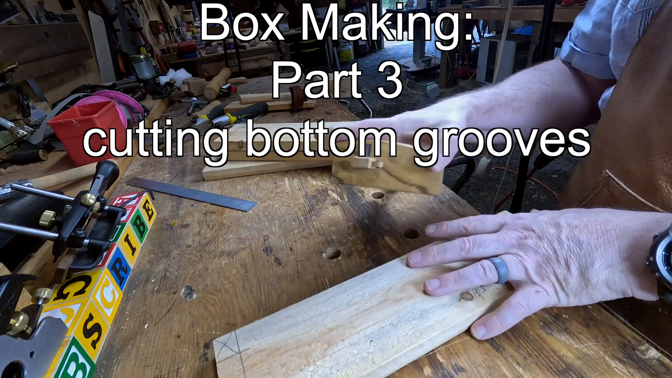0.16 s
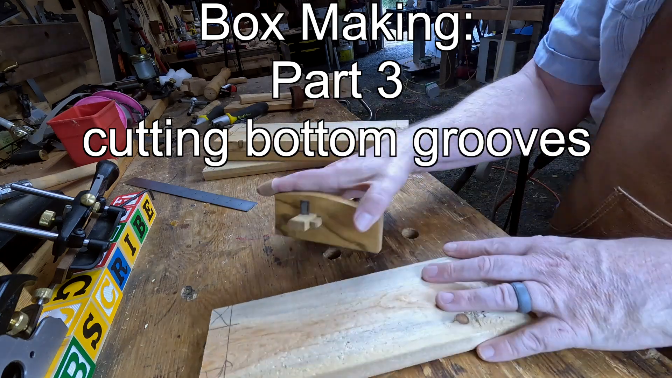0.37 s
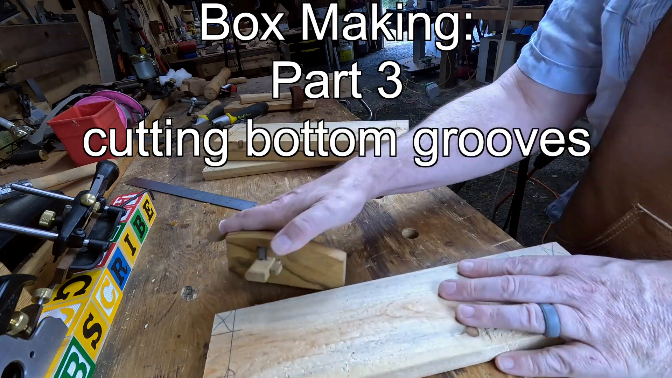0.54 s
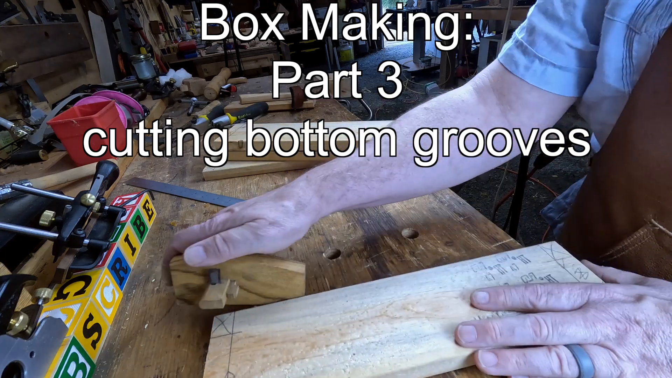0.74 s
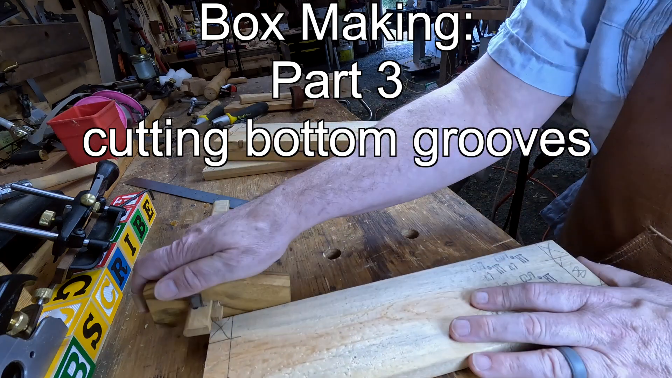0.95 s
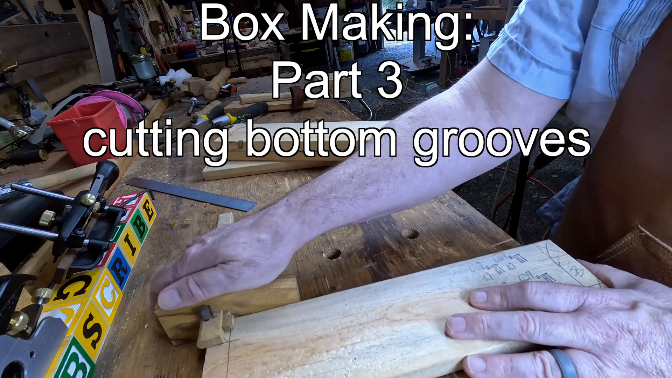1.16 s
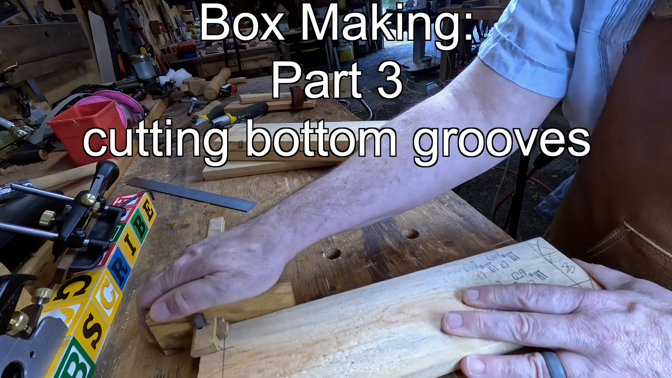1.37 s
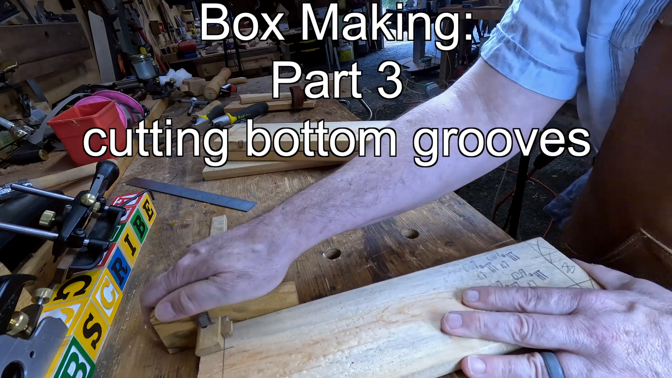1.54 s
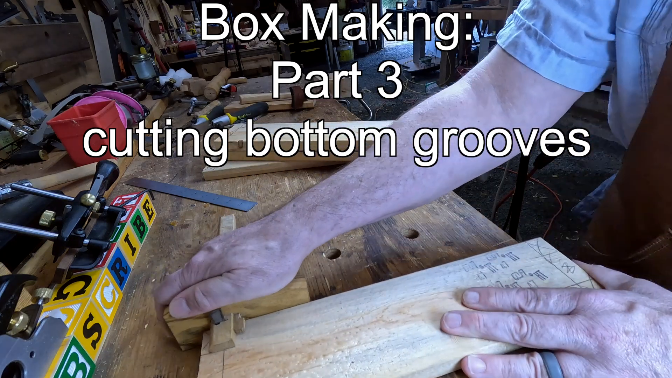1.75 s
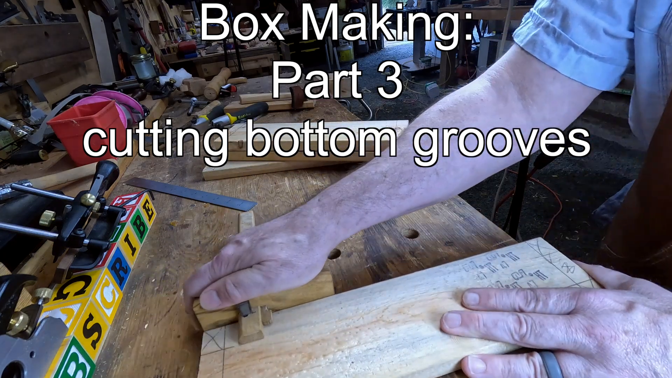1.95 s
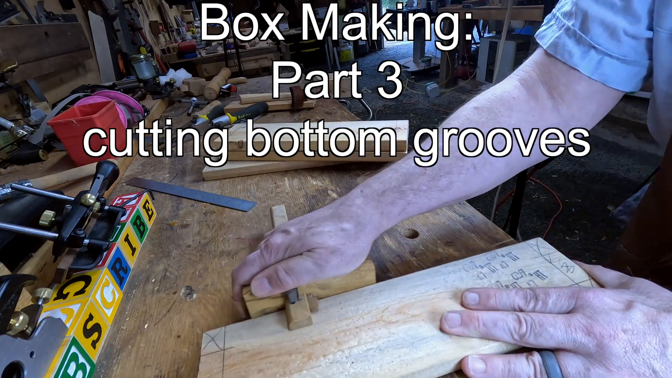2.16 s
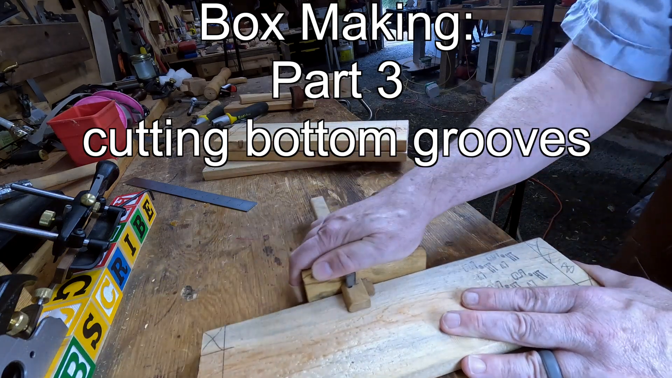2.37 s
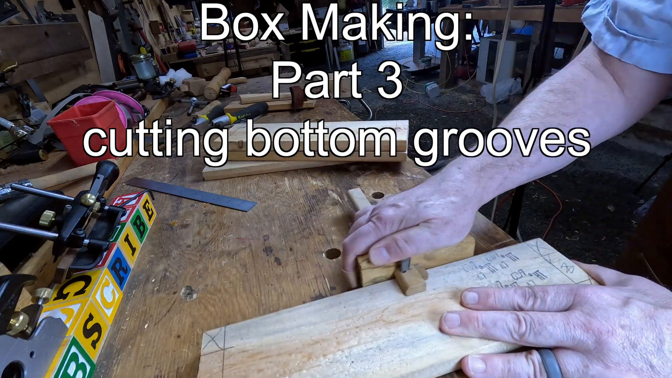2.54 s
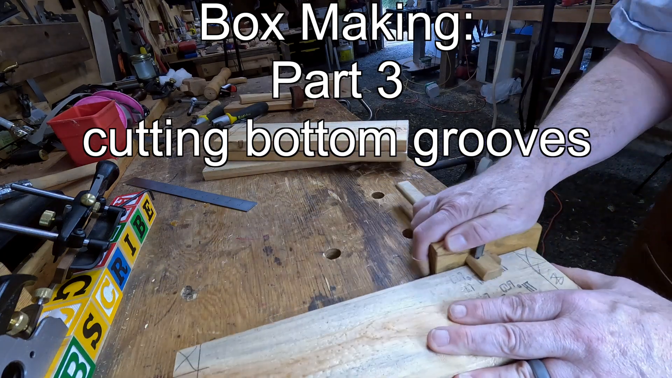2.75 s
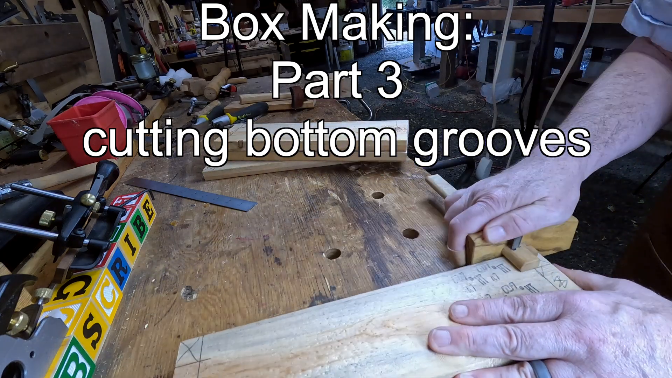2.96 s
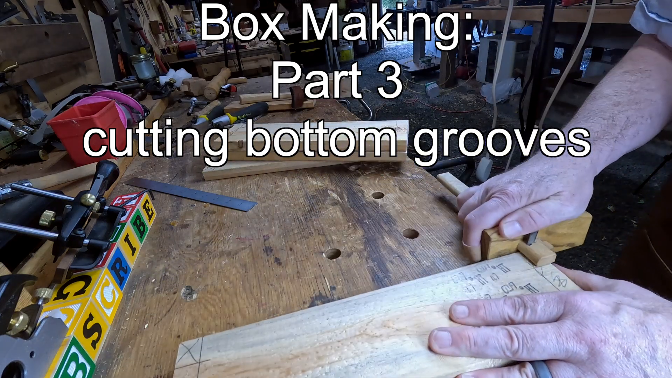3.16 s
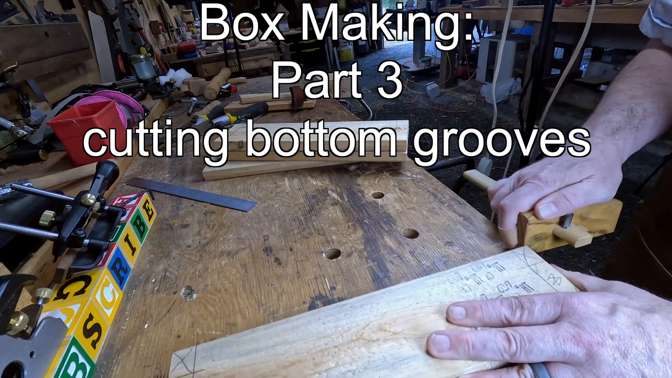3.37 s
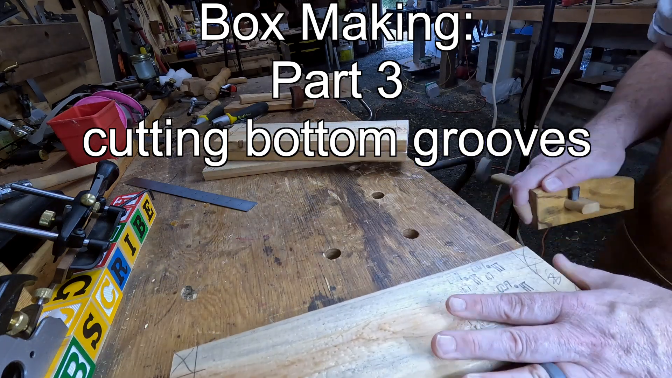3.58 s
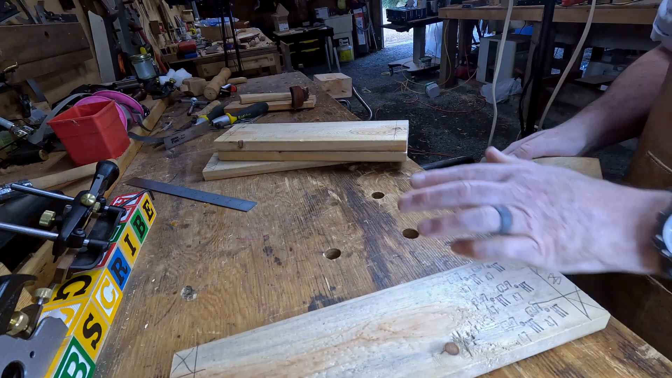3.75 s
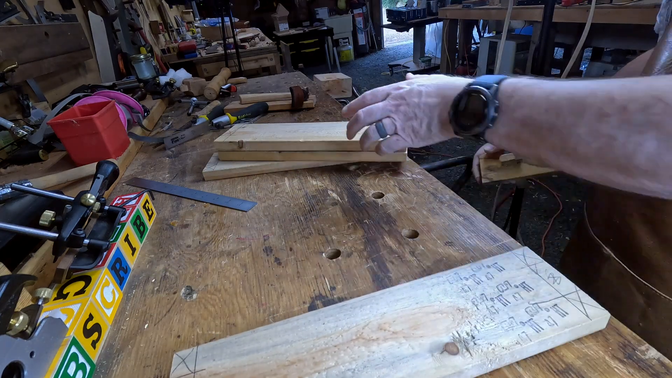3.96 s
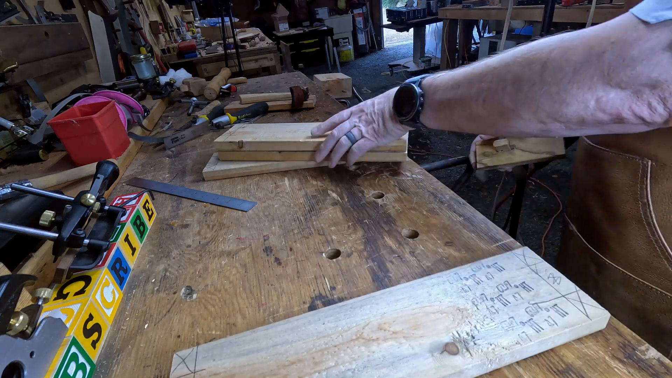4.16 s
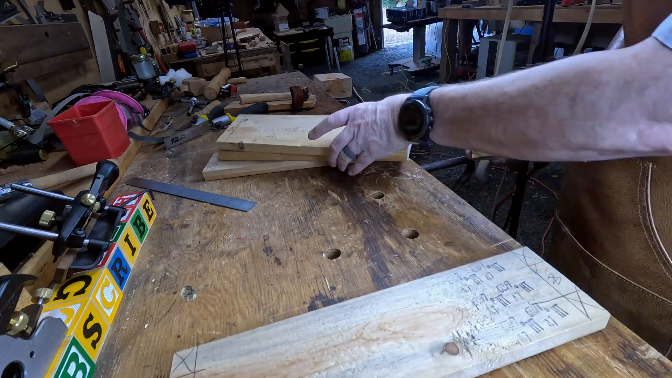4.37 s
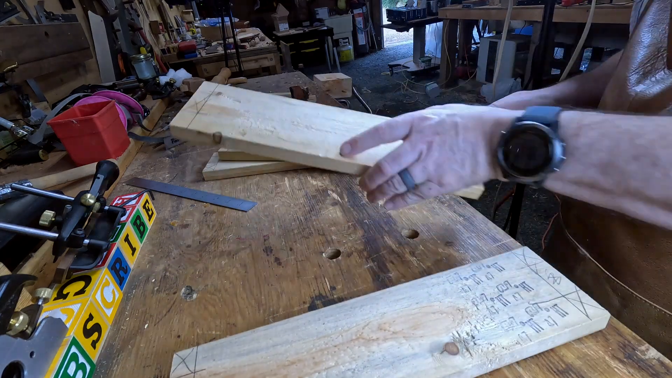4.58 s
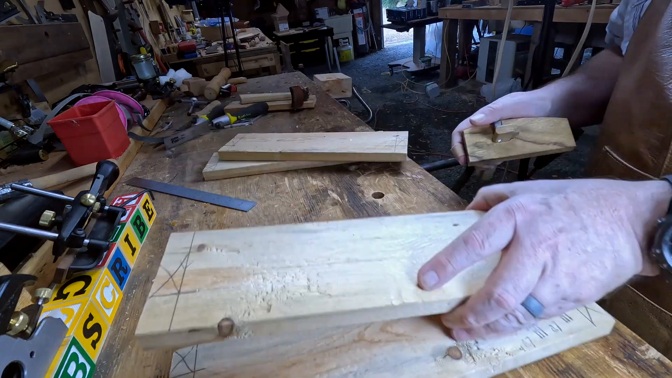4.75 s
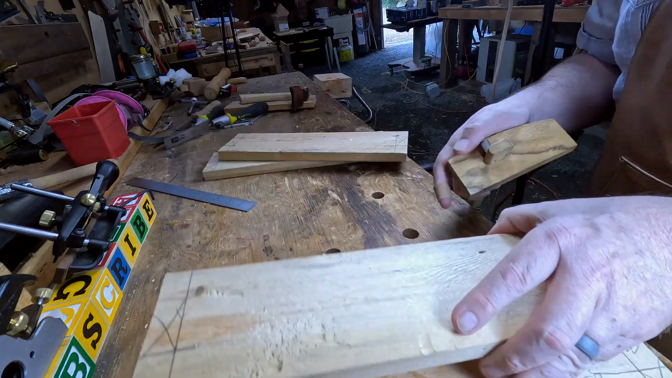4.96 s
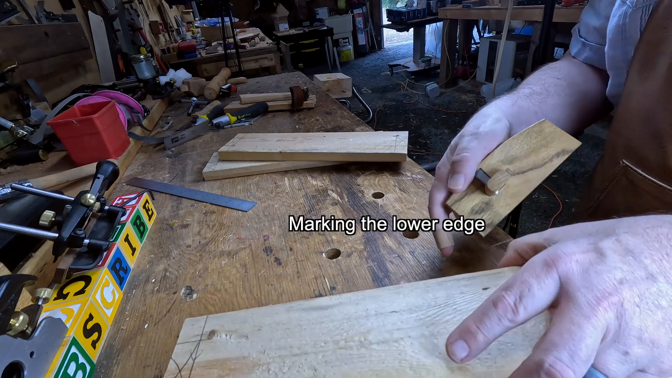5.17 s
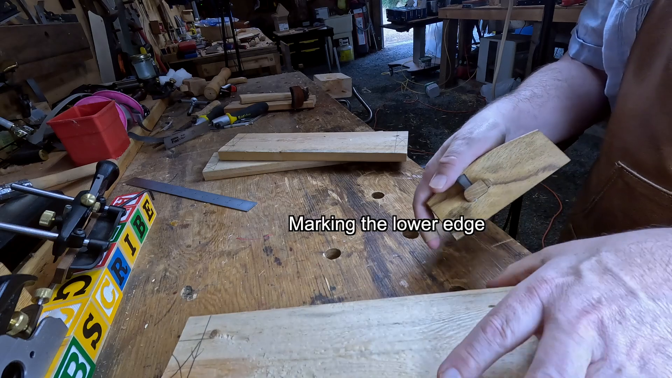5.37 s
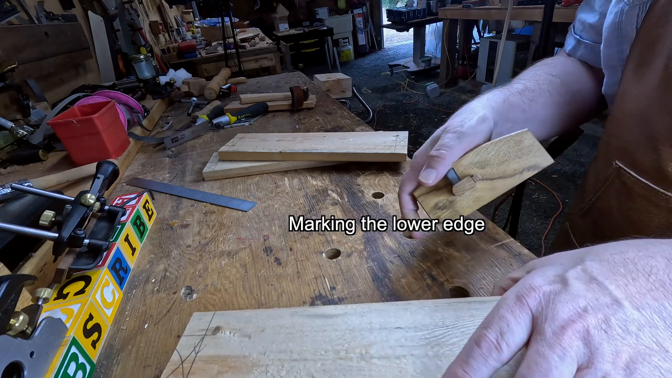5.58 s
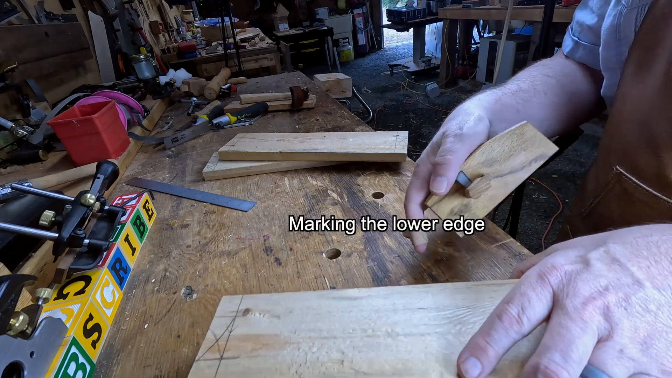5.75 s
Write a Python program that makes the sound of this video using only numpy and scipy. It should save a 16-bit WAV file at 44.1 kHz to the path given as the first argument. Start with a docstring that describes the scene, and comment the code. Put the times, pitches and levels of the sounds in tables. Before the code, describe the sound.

A close, dry stereo view of woodworking in a quiet shop with a faint steady murmur and very short room tail. From 0 to 0.8 s, palms and wood rub softly with low, cushioned bench bumps and a small click near 0.56. At about 1.0 s the tool meets the work with a double knock, a dull thud with a crisp click, then small taps and rubbing near 1.3-1.4. From 1.5 s a dry scrape along the grain swells, with a woody knock at 2.5 and its harshest, stuttering rasp near 2.7, then falls away by 3.0. Light rubs and ticks continue to 3.6; a quieter stretch has faint handling until a brief scuff and bump around 4.2-4.3. At 4.78-4.9 a board lands with a sharp crack and rattling knocks; at 5.14-5.28 another clatter rings brighter and hollow. Soft scuffs and rubs finish to about 5.8.

```python
"""In a quiet cluttered workshop, boards and a small wooden tool are handled on a heavy workbench.
Contacts thud through decaying bench modes, rap the boards through short bursts, and click as shaped noise.
Wood and skin rub along the grain: spiky noise hisses in the air and drives the tool, boards, bench and frame.
Clicks and hiss also bounce off the bench top; a short room tail and a steady murmur lie behind."""
import sys
import numpy as np
from scipy import signal
from scipy.fft import rfft, irfft, next_fast_len
from scipy.io import wavfile
from scipy.ndimage import uniform_filter1d, map_coordinates

SR = 44100
rng = np.random.default_rng(int(sys.argv[2]) if len(sys.argv) > 2 else 0)


def master_out(mix):
    """Clip the mix to full scale and print it as 16-bit PCM to the path in sys.argv[1]."""
    frames = np.transpose(np.atleast_2d(mix))
    ceiling = np.clip(frames, -1, 1)
    pcm = np.round(ceiling * 32767).astype(np.int16)
    wavfile.write(sys.argv[1], SR, pcm)


N = 256662  # samples


# hard contacts; levels are relative drives: (time [s], rap level [dB], thud level [dB], boom level [dB],
# click level below 7 kHz [dB], click level above 7 kHz [dB])
KNOCKS = [(0.561, -40, -48, -60, -16, -14.5), (1.02, -17, -23, -37, -23, -29),
          (1.06, -20, -18, -20, -9, -18.5), (1.296, -40.5, -29.5, -36, -60, -30),
          (1.539, -41, -55, -48, -36, -38), (1.952, -31, -28, -42, -14.5, -30),
          (1.966, -55, -28, -34.5, -37.5, -38), (2.501, -9.5, -21.5, -34, -21.5, -38),
          (2.662, -50, -41, -46, -15, -30), (3.026, -75, -69, -42, -27, -46),
          (3.288, -55, -41, -43, -14, -6.5), (3.294, -32.5, -26, -27.5, -14.5, -36),
          (3.592, -25.5, -28, -29.5, -76, -48), (4.093, -50, -64.5, -72, -32, -36),
          (4.27, -76, -55, -35, -28, -19.5), (4.779, -25, -20, -32, -14.5, 0.5),
          (4.828, 1, -17.5, -34, -39, -21), (4.84, -18.5, -26, -29, -21, -22),
          (4.849, -21.5, -22.5, -28, -28.5, -27), (4.859, -20, -24.5, -46, -29, -22),
          (4.901, -23, -29.5, -22.5, -47, -30), (5.049, -28.5, -29, -31, -11, -19),
          (5.142, -4.5, -20.5, -33, -33, -32), (5.154, -15, -47, -39, -39, -23),
          (5.182, -17.5, -36, -32, -14, -37), (5.195, -34, -20.5, -26.5, -12, -40),
          (5.28, -31, -26, -21.5, -39, -37), (5.416, -43, -44.5, -41, -40, -45),
          (5.616, -48, -41, -43, -42, -47), (5.797, -35, -36.5, -36, -38, -40)]
# soft pushes of palm and fingers: (time [s], thud level [dB], boom level [dB])
BUMPS = [(0.25, -59, -39), (0.271, -29.5, -37), (0.299, -46, -30), (0.326, -37, -23), (0.342, -60, -29.5),
         (0.595, -44, -32), (0.783, -52, -37.5), (0.964, -54, -33.5), (4.193, -57, -46.5),
         (4.214, -50, -31), (4.344, -42, -28), (4.459, -55.5, -40.5), (4.786, -18, -37),
         (5.214, -34, -22.5), (5.239, -31, -25), (5.607, -41, -32)]
# modes of the bench top: (frequency [Hz], level [dB], decay by 60 dB [s])
BENCH_TOP = [(167.3, -10, 0.29), (219.2, -6, 0.16), (252.2, 7, 0.089), (287.2, 2, 0.064),
             (365.3, -4.5, 0.088), (406.5, -5.5, 0.12), (497.5, -10.5, 0.099)]
# modes of the boards lying on the bench: (frequency [Hz], level [dB], decay by 60 dB [s])
BOARDS = [(537, -11, 0.057), (589, -8, 0.071), (660.5, -4.5, 0.064), (802, 0, 0.029), (899, -15.5, 0.056),
          (1040, -4, 0.023), (1147, -4.5, 0.021), (1340, -6.5, 0.033), (1512, -9.5, 0.019)]
# modes of the bench frame: (frequency [Hz], level [dB], decay by 60 dB [s])
BENCH_FRAME = [(40, -7, 0.24), (60, -11, 0.2), (96.6, 0.5, 0.25), (113.8, -10.5, 0.23)]
# colour of the clicks: (frequency [Hz], level per Hz [dB])
CLICK_COLOUR = [(530, -71), (900, 4), (2780, -1), (4230, -2.5), (5460, -9.5), (8200, -10), (9320, -29),
                (10300, -17), (14500, -35)]


def knocks():
    """Hard contacts push the bench, rap the boards and crack; soft ones only move the bench."""
    wood, air = np.zeros(N + SR), np.zeros((2, N + SR))
    t = np.arange(SR // 2) / SR
    spread_db = 2  # standard deviation of mode strengths, halved for the hard thuds

    for time, rap_db, thud_db, boom_db, *click_db in KNOCKS:
        start = round(time * SR)
        boards = chatter(ringing(BOARDS, spread_db, rise=0.45), t60=0.008)
        rap = amp(rap_db) * cushioned(boards, rap_db - click_db[0])
        thud = amp(thud_db) * ringing(BENCH_TOP, spread_db / 2, rise=0.76)
        boom = amp(boom_db) * ringing(BENCH_FRAME, spread_db, rise=0.28)
        wood[start:][:len(t)] += boom + thud + rap

        # a fast fall with a faint longer tail, after a soft onset
        fall = amp(-60 * t / 0.014) + 0.057 * amp(-60 * t / 0.076)
        shape = fall * (1 - np.exp(-t / 0.00067))
        air[:, start:][:, :len(t)] += amp(click_db)[:, None] * shape * rng.standard_normal(len(t))

    for time, thud_db, boom_db in BUMPS:
        thud = amp(thud_db) * ringing(BENCH_TOP[:6], spread_db, rise=2.9)
        boom = amp(boom_db) * ringing(BENCH_FRAME, spread_db, rise=0.23)
        wood[round(time * SR):][:len(t)] += thud + boom

    def click_bands(hz):
        high = hz ** 8 / (hz ** 8 + 7000 ** 8)
        return causal(amp(along(CLICK_COLOUR, hz)) * [1 - high, high])

    cracks = filtered(air[:, :N], click_bands).sum(axis=0)
    return wood[:N] + bench_echo(cracks, share=0.15)


CONTACT_S_PER_DB = 1.3e-5  # contact time grows as the click falls under the rap


def cushioned(x, soft_db):
    """A softer contact lasts longer and dulls the rap."""
    t = np.arange(128) / SR
    push = t * np.exp(-t / (CONTACT_S_PER_DB * max(soft_db, 2)))
    return np.convolve(x, push / push.sum())[1:len(x) + 1]


def chatter(body, t60):
    """Wood never lands in one point: a short burst of small contacts drives the body."""
    t = np.arange(SR // 30) / SR
    force = amp(-60 * t / t60) * rng.standard_normal(len(t))
    force[0] += 11  # extra weight on the first contact
    return signal.fftconvolve(body, force / np.linalg.norm(force))[:len(body)]


def causal(gain):
    """The same gains with the phase of a real body: nothing sounds before the blow."""
    cepstrum = irfft(np.log(gain + 1e-6))
    half = gain.shape[-1] - 1
    cepstrum[..., 1:half] *= 2
    cepstrum[..., half + 1:] = 0
    return np.exp(rfft(cepstrum))


# blows on the lifted board: (time [s], level [dB])
CLACKS = [(4.3044, -49), (4.847, -42), (5.141, -40), (5.182, -27.5), (5.1937, -18.5), (5.226, -34)]
# modes of the board held in the hand: (frequency [Hz], level [dB], decay by 60 dB [s])
LIFTED_BOARD = [(840, -1, .2), (1497, -8, .06), (1529, -5, .12), (1900, 0, .03), (2005, 3, .095),
                (2050, -11, .22), (2186, -7, .1), (2420, -6, .05), (2676, -8, .1), (4450, -4, .015)]


def clacks():
    """Each blow's burst of contacts rings the free modes of the lifted board."""
    wood = np.zeros(N + SR)
    for time, db in CLACKS:
        board = ringing(LIFTED_BOARD, scatter_db=1, rise=0.62)
        wood[round(time * SR):][:SR // 2] += amp(db) * chatter(board, t60=0.0065)
    return wood[:N]


# colour of the friction hiss: (frequency [Hz], level per Hz [dB])
HISS_COLOUR = [(880, -39), (1500, -2.5), (1990, 0.5), (2730, 0), (5880, -6), (9020, -19.5), (10900, -18.5),
               (13500, -27), (14100, -70)]
# loose wood singing over the hiss: (time [s], level [dB])
SING = [(0, -11), (1.4, -10), (2.6, -6.5), (3.0, -2), (3.56, 0.5), (4.1, -7.5), (5.3, -8), (5.82, -7.5)]
# modes of the wood rubbed in the hand: (frequency [Hz], level [dB], decay by 60 dB [s])
TOOL = [(1308, 2, 0.06), (1456, -4, 0.14), (2435, 0, 0.021), (2660, -2.5, 0.088), (3120, 1.5, 0.018),
        (4044, 6.5, 0.022), (5800, -17, 0.02), (6750, 9.5, 0.006)]


def rubbing():
    """Grains of friction hiss in the air and drive tool, boards and bench; slow pushes add a deep sway."""
    slide, dig, top, frame = friction()
    slide, push = slide + scuffing(), leaning()
    sway_modes = [(27.247, -19.0, 0.87), (38.6, 11, 0.25)]  # (Hz, dB, t60 s)
    grip_db = 1.5 * wobble(30)  # the contact catches and lets go
    layers = []
    for _ in range(2):
        hiss = filtered(grit(spiky_db=2.0), lambda hz: amp(along(HISS_COLOUR, hz)))
        hiss = unit(patchy(bench_echo(hiss, share=1), depth_db=2))
        hiss = slide * amp(grip_db + 1.8 * wobble(140)) * hiss
        sing = driven(slide * amp(over_time(SING)[0] + grip_db) * grit(spiky_db=3.5), TOOL)
        scrape = driven(dig * amp(grip_db) * grit(spiky_db=2.5), BOARDS[4:])
        judder = driven(top * amp(2 * grip_db) * grit(spiky_db=3.5), BENCH_TOP)
        drone = driven(frame * amp(2 * grip_db) * rng.standard_normal(N), BENCH_FRAME[1:])
        sway = driven(push * rng.standard_normal(N), sway_modes)
        layers.append(hiss + sing + scrape + judder + drone + sway)
    return widen(*layers)


# rubs of skin and wood, short or long; an end at or before the peak means a sudden stop:
# (start [s], peak [s], end [s], then levels at the peak: hiss [dB], scrape [dB], bench top [dB], bench frame [dB])
RUBS = [(0.047, 0.11, 0.23, -52.5, -94, -60.5, -45.5), (0.225, 0.277, 0.42, -50, -58, -46, -39.5),
        (0.26, 0.38, 0.65, -44.5, -63, -46, -41), (0.39, 0.647, 0.79, -49, -88, -67, -45),
        (0.74, 0.777, 0.89, -53.5, -68, -63, -55), (0.892, 0.933, 1.27, -53, -69, -53, -49),
        (0.965, 1.042, 1.21, -59, -45, -35.5, -47), (1.092, 1.415, 1.6, -55, -58, -50, -61),
        (2.97, 3.045, 3.33, -50, -62, -52, -49), (3.1, 3.323, 3.473, -46, -57, -50.5, -44),
        (3.293, 3.445, 3.49, -62, -61.5, -64, -46), (3.482, 3.61, 3.73, -66, -60, -74, -69),
        (3.81, 3.88, 4.5, -61.5, -66, -72.5, -94), (3.903, 4.218, 3.7, -51.5, -55, -82, -80),
        (4.255, 4.292, 4.43, -47.5, -60, -47, -36), (4.385, 4.41, 4.84, -58.5, -64.5, -67, -66),
        (4.752, 4.773, 5.01, -50, -69, -49, -70), (4.777, 4.778, 4.9, -37.5, -40, -26.5, -48),
        (4.778, 4.843, 4.94, -56, -36, -30, -26.5), (5.01, 5.025, 9.4, -61, -72, -70, -52),
        (5.049, 5.049, 5.136, -44.5, -39, -30.5, -53), (5.114, 5.154, 5.28, -46.5, -34, -36, -38),
        (5.127, 5.194, 5.361, -46.5, -33.5, -26, -25), (5.405, 5.44, 5.64, -53.5, -45.5, -43.5, -45),
        (5.444, 5.572, 5.67, -48.5, -72, -47.5, -47), (5.639, 5.677, 6.33, -47, -58.5, -46, -50),
        (5.709, 5.809, 6, -44, -53, -38.5, -41)]
RUB_EDGE_DB, LOAD_GROWS = 19.5, 1.38  # hiss drop at start and end; wood layers swing wider by this factor
RUB_HOLDS = 1.25  # over 1: a flatter top and steeper edges
# the tool drawn along the board, before the stutter: (time [s], hiss level [dB], scrape level [dB])
STROKE = [(1.5, -67, -99), (1.55, -59.5, -43), (1.62, -53.5, -43.5), (1.74, -55.5, -60.5),
          (1.96, -45.5, -43.5), (2.27, -45, -50.5), (2.5, -42.5, -34), (2.65, -41.5, -38.5),
          (2.7, -34, -33.5), (2.75, -36, -34.5), (2.785, -47, -44), (2.95, -46.5, -46), (3.02, -55.5, -67)]
STROKE_MID_DB = -46  # a middling hiss
STROKE_TOP_DB, STROKE_FRAME_DB = -46, -56.5  # bench levels at that hiss
TOP_GROWS, FRAME_GROWS = 1.04, 1.9  # bench dB per dB of hiss
STUTTER_HZ, STUTTER_DB_PER_DB = 104, .27  # the stroke's level flutters, deeper under load


def friction():
    """Gains of hiss, scrape, bench top and frame: rubs swell and fade, the stroke loads the bench as it hisses."""
    t, power = np.arange(N) / SR, np.zeros((4, N))
    swing_db = RUB_EDGE_DB * np.array([1, LOAD_GROWS, LOAD_GROWS, LOAD_GROWS])[:, None]
    for start, peak, end, *db in RUBS:
        before = (peak - t) / max(peak - start, .003)
        after = (t - peak) / max(end - peak, .003)
        away = np.maximum(before, after)
        power += amp(np.array(db)[:, None] - swing_db * away ** RUB_HOLDS) ** 2

    hiss_db, scrape_db = over_time(STROKE)
    press_db = hiss_db - STROKE_MID_DB
    phase = 2 * np.pi * STUTTER_HZ * t + 2 * wobble(20)
    stutter_db = STUTTER_DB_PER_DB * np.maximum(press_db, 0) * np.sin(phase)
    top_db = STROKE_TOP_DB + TOP_GROWS * press_db
    frame_db = STROKE_FRAME_DB + FRAME_GROWS * press_db
    stroke = amp(stutter_db + [hiss_db, scrape_db, top_db, frame_db])
    during = (t > STROKE[0][0]) * (t < STROKE[-1][0])
    return np.sqrt(power + stroke ** 2 * during)


# quick catches of skin on wood, before the onset softens them: (time [s], level [dB])
SCUFFS = [(2.709, -48), (4.847, -31.5), (5.527, -46), (5.534, -48), (5.573, -35), (5.653, -49),
          (5.684, -44), (5.799, -40), (5.812, -38)]
SCUFF_RISE_S, SCUFF_T60_S = 0.00073, 0.026


def scuffing():
    """Gain of the quick catches: sudden, then slipping free."""
    times, levels_db = np.transpose(SCUFFS)
    after = np.arange(N) / SR - times[:, None]
    onset = 1 - np.exp(-np.maximum(after, 0) / SCUFF_RISE_S)
    return amp(levels_db) @ (amp(-60 * np.abs(after) / SCUFF_T60_S) * onset)


# slow pushes on the bench: (time of peak [s], level [dB])
PUSHES = [(.2, -48), (2.0, -32), (2.6, -36.5), (3.298, -40.5), (4.26, -46), (5.25, -38), (5.82, -37)]
PUSH_RISE_DB_PER_S, PUSH_FALL_DB_PER_S = 79, 50


def leaning():
    """Gain of the slow pushes, each building up and easing off."""
    t = np.arange(N) / SR
    below_db = lambda s: np.maximum(PUSH_RISE_DB_PER_S * (s - t), PUSH_FALL_DB_PER_S * (t - s))
    return sum(amp(db - below_db(s)) for s, db in PUSHES)


def grit(spiky_db):
    """Friction force: noise whose grains have a long tail of sizes."""
    size_db = spiky_db * np.minimum(rng.exponential(size=N), 6.5)
    return unit(rng.standard_normal(N) * amp(size_db))


def patchy(x, depth_db):
    """Fibres catch unevenly: random gain in small patches of time and frequency."""
    z = signal.stft(x, nperseg=512)[2]
    field = uniform_filter1d(rng.standard_normal(z.shape), 8, 0)
    field = uniform_filter1d(field, 16, 1)
    return signal.istft(z * amp(depth_db * unit(field)), nperseg=512)[1][:N]


def ringing(modes, scatter_db=0, rise=0):
    """Impulse response of a body: decaying modes, scattered in strength, building up over rise cycles."""
    t = np.arange(SR // 2) / SR
    body = np.zeros(len(t))
    for hz, db, t60 in modes:
        build = 1 - np.exp(-t * hz / (rise + 1e-6))
        fall = amp(db + rng.normal(0, scatter_db) - 60 * t / t60)
        body += fall * build * np.sin(2 * np.pi * hz * t)
    return body


def driven(force, modes):
    """A body's answer to a running force, its modes scaled to unit energy."""
    body = ringing(modes)
    return signal.fftconvolve(force, body / np.linalg.norm(body))[:N]


# bounce off the bench top: (time [s], delay [ms], strength [ratio, inverted under 0])
BENCH_BOUNCE = [(0, 0.75, 0.44), (1.05, 0.77, 0.21), (1.9, 0.66, 0.092), (2.3, 0.67, 0.51),
                (2.5, 0.6, 0.094), (2.85, .73, 0.29), (3.38, 0.68, 0.56), (3.46, 0.6, 1), (3.9, 0.59, 0.21),
                (4.3, 0.84, -0.0046), (5.1, 0.7, 0.6), (5.25, 0.62, -0.84), (5.82, 0.598, -0.54)]


def bench_echo(x, share):
    """Sound bounces twice between work and bench top, combing the treble; path and strength follow the hands."""
    late_ms, strength = over_time(BENCH_BOUNCE)
    dull = uniform_filter1d(x, size=3)  # rough wood scatters the top end
    out = x
    for bounce in (1, 2):
        read_at = np.arange(N) - bounce * late_ms * SR / 1000
        out = out + (share * strength) ** bounce * map_coordinates(dull, [read_at], order=1)
    return out


# decay of the room: (frequency [Hz], decay by 60 dB [s])
ROOM_DECAY = [(100, 0.65), (1000, 0.13), (4000, 0.059), (12000, 0.13)]


def shop(x):
    """Each frequency of the room's answer dies at its own speed."""
    hz, t, z = signal.stft(rng.standard_normal((2, SR // 2)), SR, nperseg=256)
    fall = amp(-60 * t / along(ROOM_DECAY, hz)[:, None])
    tail = signal.istft(z * fall, SR, nperseg=256)[1]
    late = np.pad(x, (200, 0))[None]  # samples before the room answers
    return signal.fftconvolve(late, tail / np.linalg.norm(tail[0]), axes=1)[:, :N]


# colour of the still workshop: (frequency [Hz], level per Hz [dB])
AIR_COLOUR = [(25, -19), (87, -0.5), (549, -15), (862, -18), (1510, -4.5), (2710, -17), (10500, -19),
              (13600, -33), (14300, -56)]
AIR_DB = -67  # before the final filter


def still_air():
    """The steady murmur of the workshop, noise shaped by its colour."""
    pair = filtered(rng.standard_normal((2, N)), lambda hz: amp(along(AIR_COLOUR, hz)))
    return amp(AIR_DB) * unit(widen(*pair))


# stereo width: (frequency [Hz], left-right likeness [0 to 1])
ALIKE = [(30, 1), (500, 0.9), (2000, 0.74), (5000, 0.99), (9000, 1), (12500, 0.75)]


def widen(x, other):
    """Left and right share x and differ by an unrelated sound of the same colour."""
    turn = lambda hz: np.arccos(np.clip(along(ALIKE, hz), -1, 1)) / 2
    mid = filtered(x, lambda hz: np.cos(turn(hz)))
    side = filtered(other, lambda hz: np.sin(turn(hz)))
    return np.array([mid + side, mid - side])


def amp(db):
    """Decibels to amplitude ratio."""
    return 10 ** (np.asarray(db) / 20)


def unit(x):
    """x scaled to an RMS of one."""
    return x / np.sqrt(np.mean(x ** 2) + 1e-20)


def along(points, hz):
    """(Hz, value) points read on a log axis."""
    f, v = np.transpose(points)
    return np.interp(np.log(hz + 1), np.log(f + 1), v)


def over_time(rows):
    """One value per sample for each column after the time."""
    s, *cols = np.transpose(rows)
    return [np.interp(np.arange(N) / SR, s, c) for c in cols]


def wobble(rate):
    """A smooth random curve, rate knots a second."""
    knots = rng.standard_normal(int(N * rate / SR) + 4)
    return map_coordinates(knots, [np.arange(N) * rate / SR])


def filtered(x, response):
    """x times a complex response of frequency."""
    m = 2 * next_fast_len((N + SR // 2) // 2)
    return irfft(rfft(x, m) * response(np.fft.rfftfreq(m, 1 / SR)), m)[..., :N]


LIFTED_LAG_S = 4e-5  # the lifted board reaches the right microphone first


def scene():
    """Knocks, clacks and rubs up close, with the room's answer and murmur behind."""
    hits, lifted = knocks(), clacks()
    # the bench radiates little bass into the room
    airborne = filtered(hits + lifted, lambda hz: hz / (hz + 400))
    lag = lambda hz: np.exp(1j * np.pi * LIFTED_LAG_S * np.outer([-1, 1], hz))
    aside = filtered(lifted, lag)
    return hits + aside + amp(-10) * shop(airborne) + rubbing() + still_air()


# colour difference of the two microphones: (frequency [Hz], left minus right level [dB])
LEAN = [(60, 1.5), (150, -3), (370, -1.5), (930, -1.0), (2320, -1.5), (5800, -1.5), (14500, 2)]
TOP_HZ = 15070  # nothing passes above


def record(dry):
    """Two microphones of slightly different colour; deepest bass and treble above about 14 kHz are filtered out."""
    def colour(hz):
        balance = amp(np.outer([.5, -.5], along(LEAN, hz)))
        low_cut = hz ** 4 / (hz ** 4 + 37.0 ** 4)
        high_cut = (hz < TOP_HZ) / (1 + (hz / 14200) ** 30)
        return balance * low_cut * high_cut

    return filtered(dry, colour)


dry = scene()
out = record(dry)
master_out(out)
```